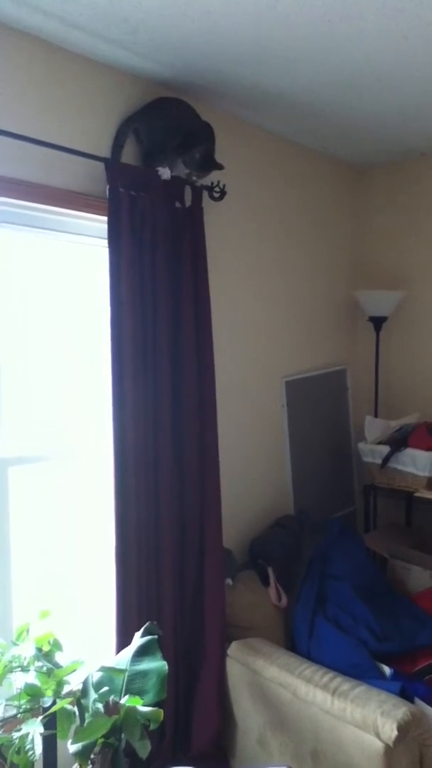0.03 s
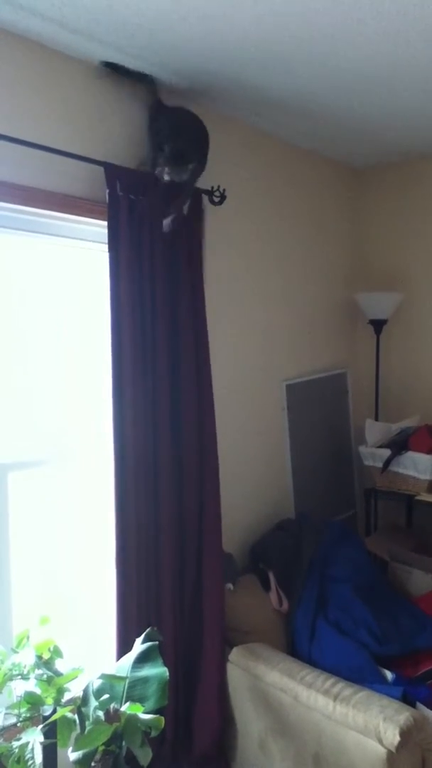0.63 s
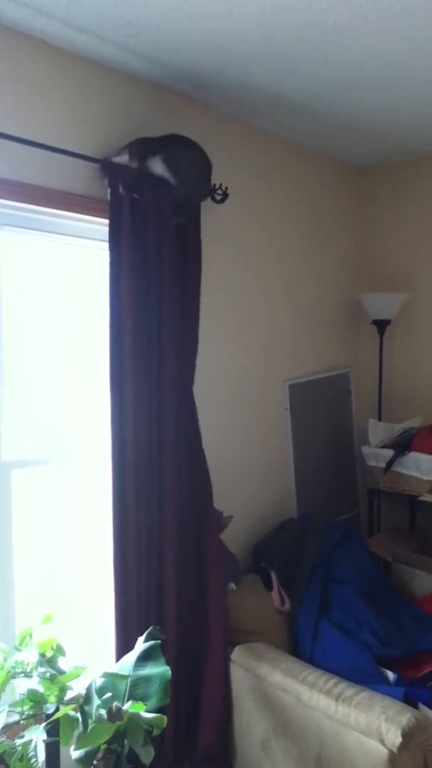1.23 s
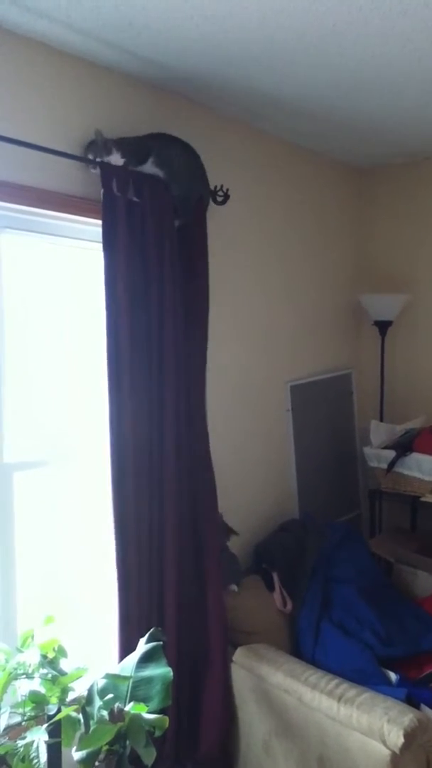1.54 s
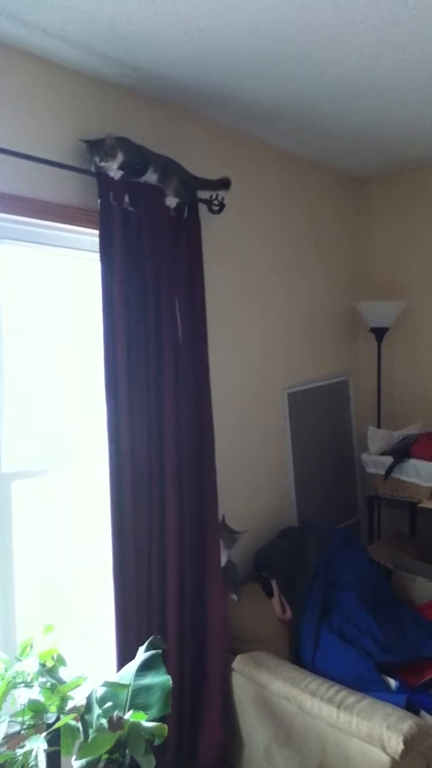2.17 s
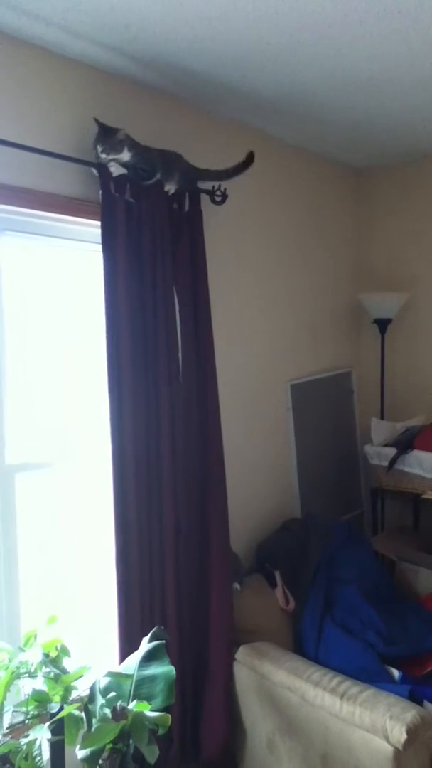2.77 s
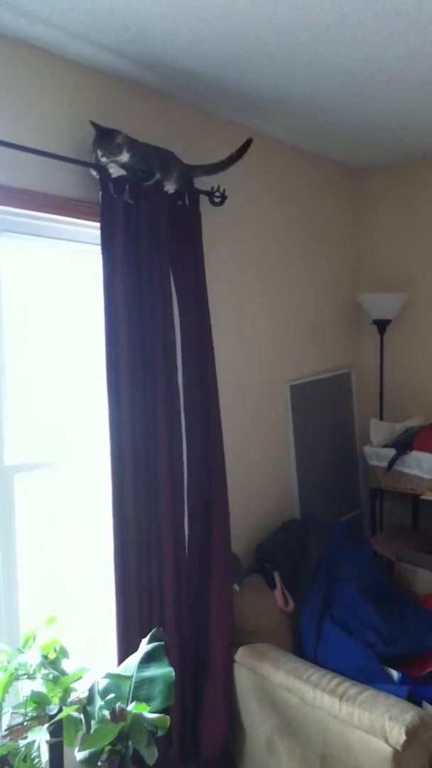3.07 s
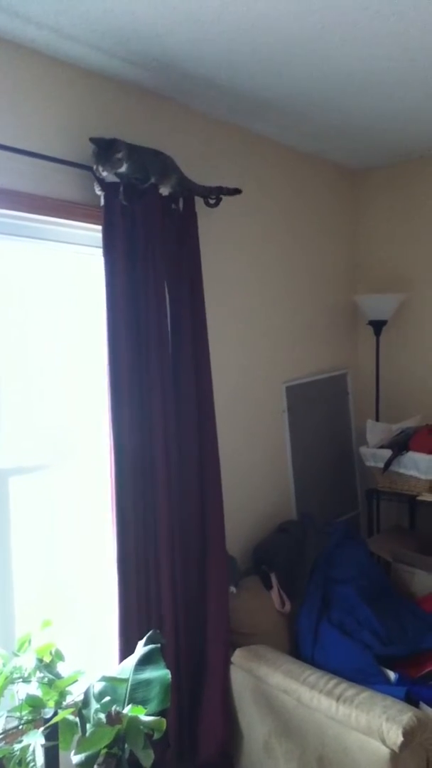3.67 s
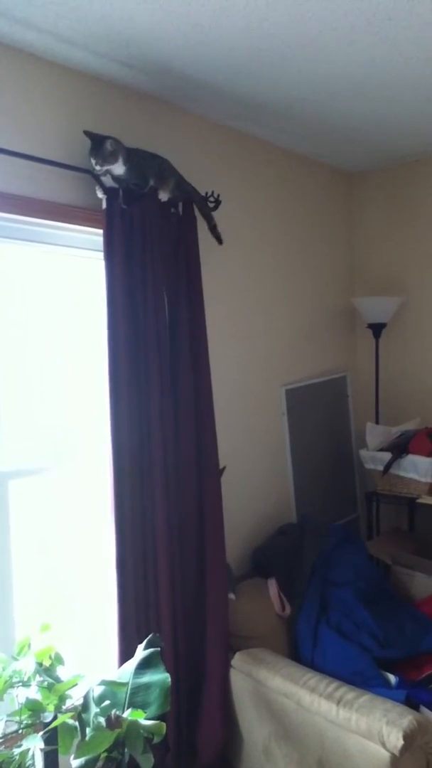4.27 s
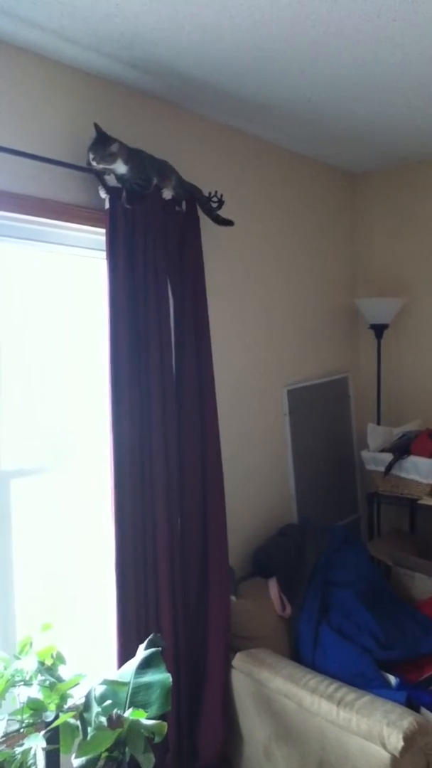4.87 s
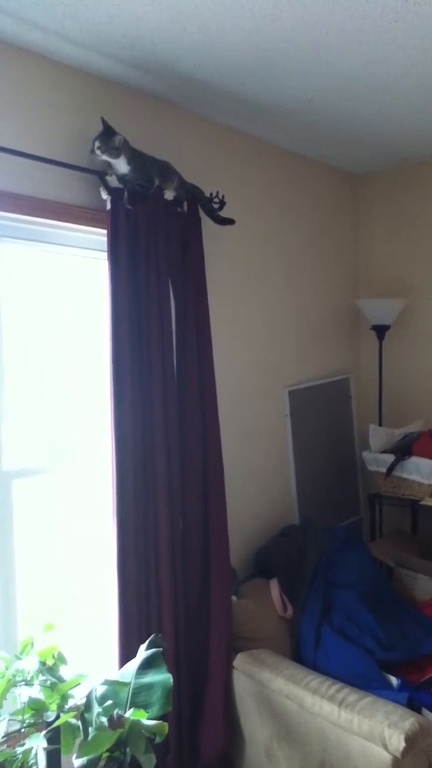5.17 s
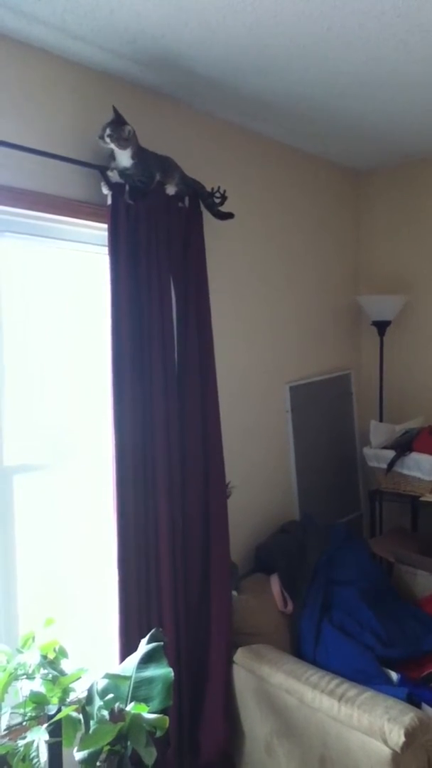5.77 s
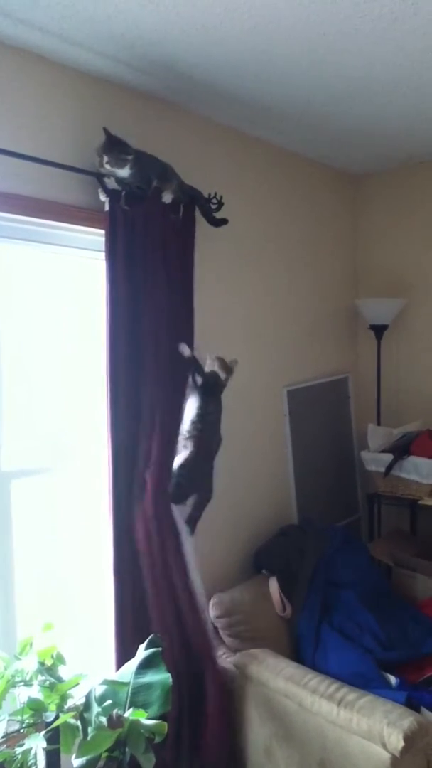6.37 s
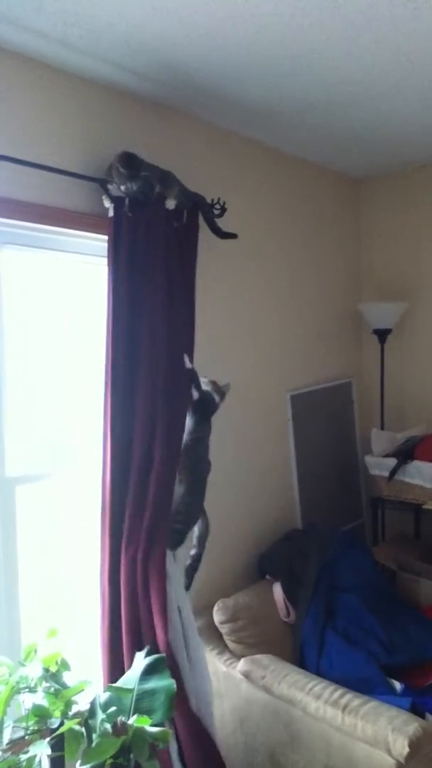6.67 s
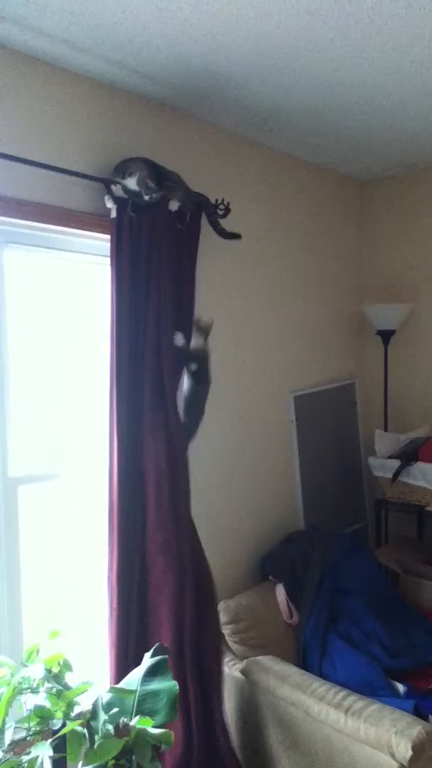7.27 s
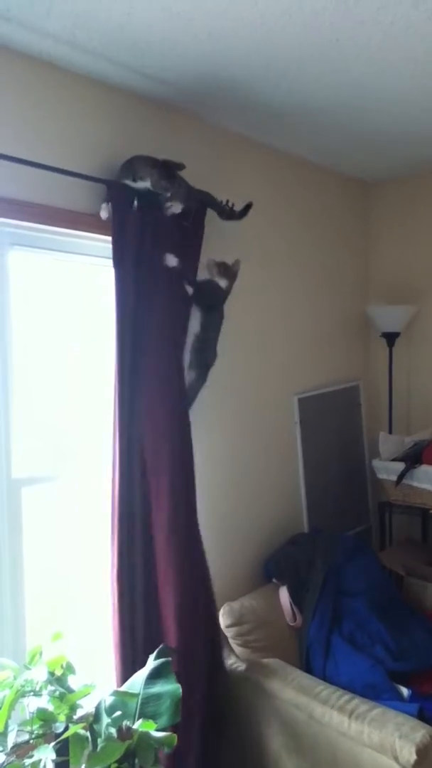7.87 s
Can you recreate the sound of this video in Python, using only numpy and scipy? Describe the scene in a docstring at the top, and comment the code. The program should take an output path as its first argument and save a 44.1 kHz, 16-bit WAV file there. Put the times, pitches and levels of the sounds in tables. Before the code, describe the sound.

From across a living room with a faint hiss, eyelets skid and claws snag in a curtain. The metal rod gives a brief creak and several loud, clattering knocks as a cat moves on it. Lighter taps and a dull bump on the wall follow. Toward the end another cat hauls itself up the heavy fabric, with quiet scratching, rustling and a few soft knocks.

```python
"""A metal curtain rod knocks in its brackets as one cat shifts about on it and another climbs the cloth.
One microphone picks them up from across a living room. Eyelets clink and skid on the rod, bodies bump
the wall, claws pluck threads and paws scuff. Each cat's effort makes the heavy curtain rustle, rub
and flap; its swings push low puffs of air, and behind it all lies the faint hiss of the room."""
import sys
import numpy as np
from scipy import signal
from scipy.fft import rfft, irfft, next_fast_len
from scipy.io import wavfile
from scipy.ndimage import uniform_filter1d

SR = 44100
rng = np.random.default_rng(int(sys.argv[2]) if len(sys.argv) > 2 else 0)


def digitize_waveform(pressure):
    """Quantize a signal to 16-bit integers and store it at the path in sys.argv[1].

    Rows of a 2-D input are taken as channels; values are limited to [-1, 1].
    """
    field = np.atleast_2d(pressure).T
    bounded = np.clip(field, -1, 1)
    quanta = np.round(bounded * 32767).astype(np.int16)
    wavfile.write(sys.argv[1], SR, quanta)


N = 357651
AGE = np.arange(SR // 2) / SR   # seconds since a contact

# The rod in its brackets, the loudest thing at the microphone. Each row: start in seconds, level in dB,
# relative treble in dB, relative bass in dB, pitch of the struck spot in Hz, its t60 in seconds.
ROD_KNOCKS = [(0.7655, -36, -25, -11, 740, 0.022), (0.885, -45, -6, 0, 650, 0.11),
              (1.066, -47.5, -22, 1.5, 850, .05), (1.343, -37, -20, -25, 1350, 0.021),
              (1.581, -13.5, -12.5, -12, 1016, 0.021), (1.589, -20, -13, -17, 1357, 0.043),
              (1.603, -20, -11, -17, 915, 0.064), (1.666, -21.5, -13.5, -3.5, 787, .04),
              (1.671, -18, -13, -28, 920, 0.043), (1.677, -24.5, -13, -27, 1383, .06),
              (1.684, -30, -16, -10, 834, .04), (1.865, -44.5, 0, 6, 895, 0.016),
              (1.9031, -20.5, -5.5, -9.5, 945, 0.063), (2.0725, -18.5, -19, -9, 780, 0.042),
              (2.0754, -15.5, -4, -22, 831, 0.065), (2.085, -21, -7, -25, 820, 0.044),
              (2.098, -27, -22, 0, 890, 0.057), (2.147, -25.5, -14, -4, 940, 0.041),
              (2.283, -34.5, -5, -9, 980, 0.1), (2.298, -32, -10, 3.5, 800, 0.054),
              (2.396, -31, -11, -3.5, 790, 0.042), (2.508, -34.5, -16, 3.5, 497, 0.023),
              (3.764, -37, -26, -4, 530, 0.022), (3.7936, -26, -31, -12, 1320, 0.029),
              (3.902, -34, -16, -23, 814, 0.048), (4.014, -44, -27, 0, 440, 0.023),
              (4.083, -42, -24, 2, 664, 0.028), (4.24, -42.5, -20, 3, 493, 0.024),
              (4.379, -33.5, -5, -12, 1400, .035), (4.394, -31.5, -8, -15, 1305, 0.035),
              (4.622, -29.5, -13.5, -26, 949, .045), (4.632, -39.5, -13, -12, 740, 0.033),
              (6.483, -32.5, -11, -7, 617, 0.02), (6.621, -37.5, -14, -14, 640, 0.026),
              (6.831, -47, -31, -4, 640, 0.037), (7.452, -45, -11.5, -5, 620, 0.04),
              (7.93, -35, -22, -13, 1225, 0.026)]
# The ring of rod and brackets. Each row: frequency in Hz, relative level in dB, t60 in seconds.
TUBE_MODES = [(205, -23, .12), (360, -18, .12), (595, -15, .11), (636, -12, .1), (735, -13, .07),
              (826, -3, .1), (909, -2, .1), (953, -4, .09), (1076, -4, .1), (1213, -12, .09),
              (1358, -9, .1), (1600, -15, .05), (1940, -10, .05), (2322, -15, .07), (2660, -3, .05),
              (2790, -8, .05), (3335, -10, .05), (3470, -12, .05), (4095, -15, .04), (4264, -13, .03)]
# The clatter of a bracket. Each row: frequency in Hz, relative level in dB.
CLATTER_SPECTRUM = [(120, -64), (370, -23), (600, -1.5), (900, 7), (1350, -4), (1700, -2.5), (2600, -10),
                    (3500, -6.5), (4400, -13), (5200, -17), (8000, -24), (14000, -61)]
HARD_KNOCK_DB, CLATTER_T60_S, CONTACT_RISE_S = -16.5, 0.044, 0.0011   # a hard knock and its two times
DOUBLINGS_PER_DB = 0.1368   # both times lengthen as the knock gets harder

def rod_knocks(spot_db, ring_db, bass_db, middle_db, treble_db):
    """The struck spot and the tube ring while the bracket clatters, for longer after a harder knock."""
    out = np.zeros(N)
    for start, db, treble, bass, hz, t60 in ROD_KNOCKS:
        stretch = 2 ** (DOUBLINGS_PER_DB * (db - HARD_KNOCK_DB))
        clatter = peak_one(coloured(noise(len(AGE)), CLATTER_SPECTRUM) * dying(CLATTER_T60_S * stretch))
        spot = from_db(spot_db) * peak_one(np.sin(2 * np.pi * hz * AGE) * dying(t60))
        tube = from_db(ring_db + db) * struck(TUBE_MODES, vary_db=1.5)   # fades under softer knocks
        blow = (clatter + spot + tube) * rising(CONTACT_RISE_S * stretch)
        low = from_db(bass + bass_db) * peak_one(band(blow, [160, 440], "band", order=4))
        middle = from_db(middle_db) * peak_one(band(blow, [490, 1650], "band", order=3))
        top_hz = np.clip(7400 * 2 ** (-0.5 * treble), SR / 15, SR / 3)
        bright = band(band(blow, 2110, "high", order=5), top_hz, "low", order=4)
        high = from_db(treble + treble_db) * peak_one(bright)
        add(out, start, from_db(db) * (low + middle + high))
    return out


# Eyelets up on the rod. Each row: start in seconds, level in dB, pitch in Hz, t60 in seconds.
EYELET_CLINKS = [(0.7655, -30.5, 3670, 0.01), (0.967, -48, 3880, .16), (1.582, -23, 2680, 0.05),
                 (1.904, -34, 4270, 0.045), (2.0771, -21, 2655, 0.058), (2.0765, -18.5, 4264, 0.034),
                 (3.79, -38, 5240, 0.033), (3.799, -47, 3290, 0.17), (3.813, -42, 5500, 0.11),
                 (6.3088, -32.5, 2580, 0.052)]

def clinks(rise_s, chatter_db, chatter_hz):
    """An eyelet taps the rod and rings briefly at a pitch of its own, chattering against the metal."""
    out = np.zeros(N)
    for start, db, hz, t60 in EYELET_CLINKS:
        chatter = from_db(chatter_db) * rms_one(band(noise(len(AGE)), chatter_hz, "low"))
        ring = np.sin(2 * np.pi * hz * AGE) + chatter * np.cos(2 * np.pi * hz * AGE)
        add(out, start, from_db(db) * peak_one(ring * dying(t60) * rising(rise_s)))
    return out


# Paws and bodies against the wall. Each row: start in seconds, level in dB, pitch in Hz.
WALL_BUMPS = [(0.717, -40.5, 174), (0.806, -37, 133), (0.843, -38.5, 155), (0.884, -39, 190),
              (0.957, -38, 168), (1.262, -30.5, 287), (1.297, -40.5, 176), (1.385, -41, 340),
              (1.458, -38, 352), (1.759, -48, 178), (1.951, -42, 277), (2.08, -35.5, 240),
              (2.221, -32, 343), (2.325, -32, 322), (4.378, -15.5, 364), (4.397, -22, 265),
              (4.414, -26, 293), (4.45, -31, 233), (4.478, -43, 223), (4.648, -34.5, 382),
              (4.675, -41, 315), (5.693, -39, 335), (5.721, -36.5, 343), (5.752, -42.5, 314),
              (6.485, -30.5, 258), (7.264, -45.5, 226), (7.487, -36, 203), (7.616, -44, 213),
              (7.955, -34.5, 252), (7.989, -38.5, 211)]
# The boom of the wall panel. Each row: frequency in Hz, relative level in dB, t60 in seconds.
PANEL_MODES = [(97, -9, .22), (122, -11, .1), (199, -9, .17), (273, -9, .14), (296, -7, .15), (360, 0, .14),
               (408, -9, .12), (474, -15, .1)]
# A padded thud. Each row: frequency in Hz, relative level in dB.
THUD_SPECTRUM = [(40, -4), (95, -7.5), (200, -5), (330, 6.5), (480, -4), (800, -11.5), (1500, -25),
                 (3000, -46)]
THUD_T60_S, SOFT_THUD_HZ, WALL_RING_DB = 0.036, 203, -18.5
DEEP_DB_PER_OCTAVE, WALL_DB_PER_OCTAVE = -9, 17.5

def bumps(tone_db, body_db, deep_db, rise_s):
    """A padded blow thuds; a firmer one is higher, has less deep bass and rings the wall panel more."""
    out = np.zeros(N)
    for start, db, hz in WALL_BUMPS:
        firmness = np.log2(hz / SOFT_THUD_HZ)
        thud = peak_one(coloured(noise(len(AGE)), THUD_SPECTRUM) * dying(THUD_T60_S))
        tone = from_db(tone_db) * peak_one(np.sin(2 * np.pi * hz * AGE) * dying(THUD_T60_S))
        boom = from_db(WALL_RING_DB + WALL_DB_PER_OCTAVE * firmness) * struck(PANEL_MODES, vary_db=4.0)
        blow = (thud + tone + boom) * rising(rise_s)
        deep_gain = from_db(deep_db + DEEP_DB_PER_OCTAVE * firmness)
        deep = deep_gain * peak_one(band(blow, 218, "low", order=5))
        body = from_db(body_db) * peak_one(band(blow, 224, "high", order=4))
        add(out, start, from_db(db) * (deep + body))
    return out


# Claws catching in the weave. Each row: start in seconds, level in dB, relative top treble in dB,
# pitch of the taut cloth in Hz, relative level of that resonance in dB, t60 of the pull in seconds.
CLAW_SNAGS = [(0.7634, -35, -9, 4630, -6, 0.014), (0.7865, -33.5, 1, 4380, -11, 0.034),
              (0.7965, -52, -5, 7000, -18, 0.023), (0.8169, -37.5, -4, 6900, -26, 0.07),
              (0.947, -45.5, 0.5, 3700, 7, 0.17), (0.967, -40, -5.5, 3750, -9, 0.056),
              (1.4, -54, 0, 6000, -15, .1), (1.582, -27.5, -19.5, 1980, 0, 0.038),
              (1.903, -39, -7.5, 4220, -22, 0.16), (2.147, -33, -5, 7500, -24, 0.11),
              (2.294, -39.5, -8.5, 2300, -13, 0.0062), (2.45, -43.5, -20, 3720, -21, 0.072),
              (3.385, -58, -2, 5000, -12, .02), (3.545, -56, -10, 4500, -14, 0.022),
              (3.702, -46, -3, 4430, -21, 0.015), (3.79, -43, -3, 6400, 4, 0.0096),
              (3.796, -36.5, -14, 1850, -1, 0.051), (4.083, -51.5, -6, 7060, 8, 0.022),
              (4.184, -46, -8, 3670, -17, 0.062), (4.33, -48, -25, 3020, -11, 0.35),
              (4.378, -38, -37, 1690, 0, 0.21), (4.435, -38.5, -34, 2400, -6, 0.076),
              (4.736, -54.5, -24, 2400, 3, 0.053), (5.326, -50.5, -22, 2560, 6, 0.14),
              (5.341, -52, -25, 3560, -3, 0.045), (5.648, -53.5, -21, 2360, -1, .12),
              (5.97, -45, -9.5, 3480, -13, 0.035), (6.3088, -32, -15, 4300, -11.5, 0.013),
              (6.422, -44.5, -12, 2580, -20, 0.096), (6.481, -44, -11, 1830, 1, 0.031),
              (6.586, -53, -14, 3000, -8, .01), (6.613, -42.5, -9, 4690, -16, 0.025),
              (6.623, -60, -9, 4000, -19, 0.014), (6.632, -46, -8, 3000, -23, .012),
              (6.679, -45, -12, 7300, -15, .03), (6.694, -50, -4, 7000, -17, .015),
              (6.741, -50.5, -7, 6100, -10, 0.047), (6.884, -53, -2, 5030, -12, 0.012),
              (6.963, -55, 5, 12500, 15, 0.045), (7.027, -57.5, -8.5, 6700, 5, .05),
              (7.365, -50, -7, 3950, -7, 0.012), (7.44, -50.5, -2, 6550, -23, 0.022),
              (7.454, -51, 1, 6500, -18, 0.016), (7.524, -47.5, -10, 5140, -27, 0.12),
              (8.093, -42, 1, 4840, -20.5, 0.0097)]
# Plucked threads. Each row: frequency in Hz, relative level in dB.
THREAD_SPECTRUM = [(300, -8.5), (700, 4.5), (1400, 1.5), (2400, -3.5), (3700, -3), (6000, -9), (8200, -12),
                   (12500, -17.5), (16000, -29)]

def claws(slips_per_s, pluck_db, rise_s, taut_q):
    """A claw tears past a dying run of threads and the taut cloth resonates."""
    out = np.zeros(N)
    for start, db, top_db, hz, taut_db, t60 in list(CLAW_SNAGS) + scratches():
        slips = grains(slips_per_s, spread_db=-1.0, count=len(AGE))
        pull = peak_one(coloured(slips, THREAD_SPECTRUM) * dying(t60) * rising(rise_s))
        pull = pull + from_db(taut_db) * peak_one(resonance(pull, hz, hz / taut_q))
        pluck = from_db(pluck_db) * peak_one(band(pull, 7260, "low", order=4))
        snap = from_db(top_db) * peak_one(band(pull, 7300, "high", order=5))
        add(out, start, from_db(db) * (pluck + snap))
    return out


def scratches(per_s=9.1, resting_db=-10, mean_db=-59, spread_db=5, top_db=-9, taut_db=-8, t60=0.093):
    """Faint chance catches as CLAW_SNAGS rows, more frequent the further effort rises above rest."""
    slack_hz, tight_hz = 2000, 6800
    effort = sum(efforts()) - from_db(resting_db)
    starts = np.flatnonzero(rng.random(N) < per_s * effort / SR) / SR
    size, tension = rng.random((len(starts), 2)).T
    levels = mean_db + spread_db * (2 * size - 1)
    pitches = slack_hz * (tight_hz / slack_hz) ** tension
    return [(start, db, top_db, hz, taut_db, t60) for start, db, hz in zip(starts, levels, pitches)]


# Eyelets dragged along the rod. Each row: start in seconds, level in dB, t60 in seconds.
EYELET_SKIDS = [(0.788, -29.5, 0.03), (0.816, -43.5, 0.32)]
# The zing of an eyelet. Each row: frequency in Hz, width in Hz, relative level in dB.
EYELET_RESONANCES = [(2890, 1000, 1), (5080, 190, -4), (6870, 280, -3), (9400, 410, -6), (10100, 400, -7),
                     (11800, 810, -6)]

def skids(slips_per_s, rise_s):
    """An eyelet jerks along the rod: fine slips ring its bright resonances."""
    out = np.zeros(N)
    for start, db, t60 in EYELET_SKIDS:
        slips = grains(slips_per_s, spread_db=-5.0, count=len(AGE))
        zing = sum(from_db(level) * ringing(slips, hz, width) for hz, width, level in EYELET_RESONANCES)
        add(out, start, from_db(db) * peak_one(zing * dying(t60) * rising(rise_s)))
    return out


# Paws scraping over the cloth. Each row: start in seconds, length in seconds, level in dB,
# pitch of the resonance in Hz, upper edge of the rasp in Hz.
PAW_SCUFFS = [(0.773, 0.07, -47, 1720, 3000), (1.253, 0.034, -43.5, 623, 1310),
              (1.337, 0.03, -46, 1210, 1750), (1.431, 0.014, -49.5, 1100, 2200),
              (1.551, 0.041, -40, 2450, 3340), (2.205, .05, -39, 585, 960), (2.294, 0.02, -35, 730, 2380),
              (2.419, 0.023, -45, 910, 1600), (2.442, 0.016, -41, 576, 1000),
              (3.43, 0.027, -45.5, 645, 2480), (3.89, 0.04, -59, 900, 1810),
              (4.085, 0.017, -52.5, 880, 1670), (4.196, 0.029, -43.5, 910, 3750),
              (4.233, 0.031, -46, 826, 1390), (4.642, 0.036, -46, 620, 1100),
              (5.691, 0.033, -46, 610, 1410), (6.277, 0.032, -50.5, 810, 3500),
              (6.414, 0.039, -51, 660, 2200), (6.712, 0.058, -53.5, 2280, 10100),
              (7.061, 0.047, -61, 2920, 4500), (7.525, 0.032, -65, 1520, 9000),
              (7.927, 0.014, -37.5, 780, 3080)]

def scuffs(slips_per_s, width_hz, rise_s, release_t60_s):
    """A paw drags for a moment: dense slips rasp and sound one broad resonance."""
    out = np.zeros(N)
    for start, length, db, hz, edge_hz in PAW_SCUFFS:
        slips = grains(slips_per_s, spread_db=1.0, count=len(AGE))
        rasp = rms_one(band(band(slips, edge_hz, "low", order=4), 275, "high"))
        body = ringing(slips, hz, width_hz)
        attack = np.minimum(AGE / rise_s, 1)
        release = from_db(-60 * np.maximum(AGE - length, 0) / release_t60_s)
        add(out, start, from_db(db) * attack * release * rms_one(rasp + body))
    return out


# Two creaks of the rod and the thin squeak of a claw, one curve each.
# Each row of a curve: time in seconds, pitch in Hz, level in dB.
CREAK_CURVES = [
    [(1.515, 330, -79), (1.535, 416, -59), (1.555, 573, -37), (1.576, 625, -24), (1.59, 620, -84)],
    [(2.74, 302, -88), (2.78, 314, -52), (2.81, 368, -46), (2.85, 389, -54), (2.90, 390, -83)],
    [(6.40, 3300, -90), (6.406, 3400, -50), (6.416, 3650, -46), (6.423, 3520, -49), (6.43, 3450, -90)],
]

def creak(curve, overtone_db, roughness):
    """Sticking and slipping makes a short rising tone, uneven in strength."""
    hz, db = in_time(curve)
    phase = 2 * np.pi * np.cumsum(hz) / SR
    tone = np.sin(phase) + from_db(overtone_db) * np.sin(2 * phase)
    grip = 1 + roughness * rms_one(band(noise(N), 65, "low"))
    return (from_db(db) - from_db(db.min())) * grip * tone


# The rod sliding briefly in a bracket. Each row: time in seconds, level in dB.
SLIDE_LEVEL = [(4.80, -96), (4.87, -62), (4.93, -50.5), (4.97, -60), (5.03, -94)]

def rod_slide(hz, width_hz):
    """Friction noise rings in one resonance of the rod."""
    db, = in_time(SLIDE_LEVEL)
    return (from_db(db) - from_db(db.min())) * ringing(noise(N), hz, width_hz)


# The cat up on the rod turns round, stumbles and settles. Each row: time in seconds, effort in dB.
PERCH_EFFORT = [(0.5, -18), (0.86, -1), (1.14, -11.5), (1.3, 1), (1.56, 6.5), (1.8, -4), (2.05, -9.5),
                (2.27, 5.5), (2.46, -3), (2.62, -31), (3.25, -22), (3.82, -2.5), (4.03, -12), (4.45, -6.5),
                (5.1, -23.5), (6.1, -28)]
# The cat below hauls itself up the cloth. Each row: time in seconds, effort in dB.
CLIMB_EFFORT = [(6.05, -59), (6.27, 2), (6.55, -3.5), (6.7, 2.5), (6.88, -4), (7.25, -9.5), (7.53, 1.5),
                (7.72, -7), (7.9, -7), (8.11, 7)]

def efforts():
    """Effort of the perching and of the climbing cat, as gains."""
    return from_db(in_time(PERCH_EFFORT)[0]), from_db(in_time(CLIMB_EFFORT)[0])


# Slipping fibres, rubbing folds and flapping cloth. Each row: frequency in Hz, relative level in dB.
RUSTLE_SPECTRUM = [(880, -32), (1500, -7), (2410, 1.5), (2860, -4.5), (8570, -8), (12100, -15.5),
                   (16000, -48)]
RUB_SPECTRUM = [(130, -53), (200, -14), (361, 0), (429, -6.5), (772, -2.5), (866, -16), (963, -6),
                (2500, -28.5), (3250, -24.5), (5500, -120)]
FLAP_SPECTRUM = [(40, -30), (80, -15), (150, 0.5), (215, 6.5), (280, 1), (380, -23), (900, -27.5)]
PERCH_RUSTLE_DB, CLIMB_RUSTLE_DB = -62, -65   # at an effort of 0 dB
PERCH_RUB_DB, CLIMB_RUB_DB = -54, -64   # folds bunched on the rod rub more

def cloth(crackle_db, flap_db, flap_db_per_effort_db):
    """With the cats' effort, fibres slip in fine grains, single threads snap, and folds rub and flap."""
    perching, climbing = efforts()
    rustle = from_db(PERCH_RUSTLE_DB) * perching + from_db(CLIMB_RUSTLE_DB) * climbing
    rub = from_db(PERCH_RUB_DB) * perching + from_db(CLIMB_RUB_DB) * climbing
    sway = from_db(flap_db) * (perching + climbing) ** flap_db_per_effort_db
    fibres = rustle * coloured(grains(3000, spread_db=5.5, count=N), RUSTLE_SPECTRUM)
    crackle = rustle * from_db(crackle_db) * thread_snaps(per_s=35, spread_db=2.5)
    folds = rub * coloured(grains(1200, spread_db=3.0, count=N), RUB_SPECTRUM)
    flaps = sway * coloured(noise(N), FLAP_SPECTRUM)
    return in_room(fibres + folds, wet_db=3.5) + crackle + flaps


# A snapping thread. Each row: frequency in Hz, relative level in dB.
SNAP_SPECTRUM = [(900, -34), (2000, 7), (5000, 4), (11000, 5), (16000, -36)]

def thread_snaps(per_s, spread_db):
    """Lone threads let go at random moments; rms 1."""
    return coloured(grains(per_s, spread_db, count=N), SNAP_SPECTRUM)


def rips(per_s, rip_db):
    """Under the climber's weight its claws tear single fibres: dry, bright ticks."""
    _, climbing = efforts()
    return from_db(rip_db) * climbing * thread_snaps(per_s, spread_db=4.0)


# Air from the swinging curtain. Each row: time of the crest in seconds, level in dB.
AIR_PUFFS = [(0.86, -40), (1.0, -44), (1.269, -46), (2.21, -39), (4.41, -41), (5.22, -43), (5.39, -44),
             (6.33, -45), (7.24, -41)]
# The rumble of that air at the microphone. Each row: frequency in Hz, relative level in dB.
RUMBLE_SPECTRUM = [(10, -9), (26, 2.5), (45, -10.5), (80, -30), (250, -67)]

def air(half_puff_s, draught_db):
    """Each swing of the curtain pushes a deep puff that swells and fades over a steady draught."""
    t = np.arange(N) / SR
    puffs = sum(from_db(db) * np.exp(-((t - crest) / half_puff_s) ** 2) for crest, db in AIR_PUFFS)
    return (from_db(draught_db) + puffs) * coloured(noise(N), RUMBLE_SPECTRUM)


# Room tone where the microphone stands. Each row: frequency in Hz, relative level in dB.
HISS_SPECTRUM = [(12, -26), (20, -3), (77, -12), (110, -10.5), (187, -27.5), (204, -20.5), (228, -36),
                 (310, -20.5), (337, -23), (422, -24.5), (678, -27), (1030, -27), (2670, -35.5),
                 (4540, -36.5), (10000, -39.5), (16000, -49)]

def room_hiss(db):
    """The faint, steady noise of the living room."""
    return from_db(db) * coloured(noise(N), HISS_SPECTRUM)


# The decay of the living room. Each row: frequency in Hz, t60 in seconds.
ROOM_DECAY = [(100, 0.51), (400, 0.38), (1000, 0.21), (3000, 0.27), (8000, 0.22), (15000, 0.14)]

def in_room(x, wet_db, onset_s=0.003):
    """Direct sound plus diffuse reflections that build up and die away octave by octave."""
    edges = np.geomspace(50, 17000, 10)
    tail = np.zeros(len(AGE))
    for low, high in zip(edges, edges[1:]):
        t60 = at_hz(ROOM_DECAY, np.sqrt(low * high))
        tail += band(noise(len(AGE)), [low, high], "band") * dying(t60)
    tail *= 1 - np.exp(-(AGE / onset_s) ** 2)
    tail /= np.sqrt(np.sum(tail ** 2))
    return x + from_db(wet_db) * signal.fftconvolve(x, tail)[:N]


def from_db(db):
    """Decibels to gain."""
    return 10 ** (np.asarray(db) / 20)


def rms_one(x):
    """Scale to rms 1."""
    return x / np.sqrt(np.mean(x ** 2) + 1e-20)


def peak_one(x):
    """Scale so that the loudest 5 ms have rms 1."""
    return x / np.sqrt(uniform_filter1d(x ** 2, size=220, mode="constant").max() + 1e-20)


def in_time(rows):
    """Each column of a curve at every sample."""
    times, *columns = np.transpose(rows)
    return [np.interp(np.arange(N) / SR, times, column) for column in columns]


def at_hz(points, hz):
    """Read a table on a log-frequency axis."""
    frequencies, values = np.transpose(points)
    return np.interp(np.log(hz + 1e-3), np.log(frequencies), values)


def noise(count):
    """White noise."""
    return rng.standard_normal(count)


def grains(per_s, spread_db, count):
    """Random clicks of uneven size and either sign."""
    sizes = from_db(spread_db * np.minimum(rng.exponential(1, count), 4))
    return (rng.random(count) < per_s / SR) * sizes * rng.choice([-1, 1], count)


def coloured(x, spectrum):
    """Give a steady noise or a stream of grains a spectrum; rms 1."""
    size = next_fast_len(len(x))
    hz = np.arange(size // 2 + 1) * SR / size
    return rms_one(irfft(rfft(x, size) * from_db(at_hz(spectrum, hz)), size)[:len(x)])


def band(x, hz, kind, order=2):
    """Butterworth filter."""
    return signal.sosfilt(signal.butter(order, hz, kind, fs=SR, output="sos"), x)


def resonance(x, hz, width_hz):
    """One resonant peak."""
    return signal.lfilter(*signal.iirpeak(hz, hz / width_hz, fs=SR), x)


def ringing(x, hz, width_hz):
    """The same resonance twice over, for steeper sides; rms 1."""
    return rms_one(resonance(resonance(x, hz, width_hz), hz, width_hz))


def rising(rise_s):
    """Onset of a contact, with time constant rise_s."""
    return 1 - np.exp(-AGE / rise_s)


def dying(t60):
    """Envelope that falls 60 dB in t60 seconds."""
    return np.exp(-np.log(1000) * AGE / max(t60, .004))


def struck(modes, vary_db):
    """Each blow sets the modes ringing with strengths of its own."""
    ring = np.zeros(len(AGE))
    for k, (hz, db, t60) in enumerate(modes):
        strength = from_db(db + vary_db * rng.normal()) * (-1) ** k
        ring += strength * dying(t60) * np.sin(2 * np.pi * hz * AGE)
    return peak_one(ring)


def add(track, start_s, sound):
    """Mix a sound into the track."""
    at = round(start_s * SR)
    track[at:at + len(sound)] += sound[:N - at]


def scene():
    """Everything reaches one microphone across the room from the curtain."""
    knocks = rod_knocks(spot_db=-2.0, ring_db=6.5, bass_db=-0.5, middle_db=-0.5, treble_db=-3.0)
    paws = scuffs(slips_per_s=2500, width_hz=450, rise_s=0.00077, release_t60_s=0.029)
    rod = in_room(knocks + paws, wet_db=-5.0) + rod_slide(hz=930, width_hz=300)
    eyelets = in_room(clinks(rise_s=0.00056, chatter_db=-4.5, chatter_hz=328), wet_db=-14.0)
    creaks = sum(creak(curve, overtone_db=-11.0, roughness=0.3) for curve in CREAK_CURVES)
    thuds = bumps(tone_db=-1.0, body_db=-5.5, deep_db=-0.5, rise_s=0.0043)
    wall = in_room(thuds + creaks, wet_db=-6.5)
    catches = claws(slips_per_s=5000, pluck_db=0.5, rise_s=0.00094, taut_q=7)
    snags = in_room(catches + skids(slips_per_s=2700, rise_s=0.0018), wet_db=-2.5)
    curtain = cloth(crackle_db=-4.5, flap_db=-54.0, flap_db_per_effort_db=0.26)
    curtain += rips(per_s=60, rip_db=-66.5)
    background = air(half_puff_s=0.099, draught_db=-57.5) + room_hiss(db=-51)
    return (rod + eyelets + wall + snags + curtain + background)[None]


def record(dry):
    """The treble is cut steeply above 15.9 kHz."""
    return signal.sosfilt(signal.ellip(10, .1, 80, 15900, fs=SR, output="sos"), dry)


dry = scene()
out = record(dry)
digitize_waveform(out)
```